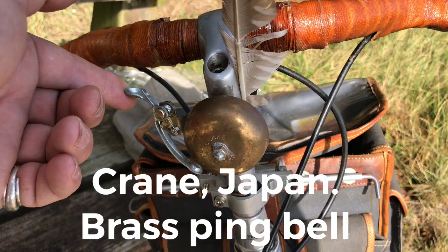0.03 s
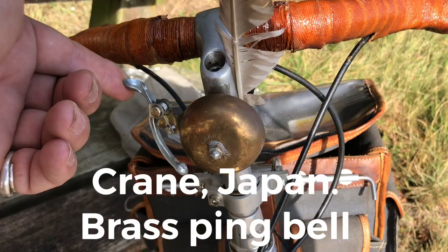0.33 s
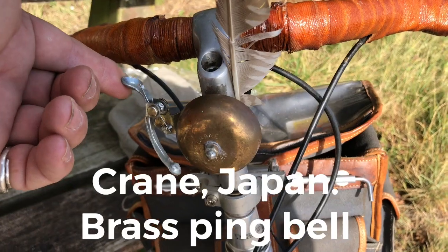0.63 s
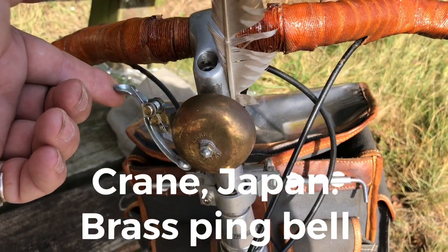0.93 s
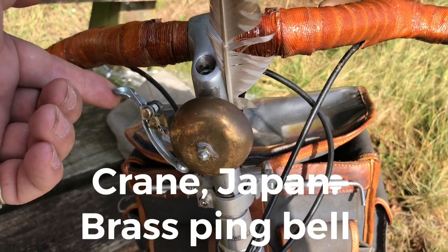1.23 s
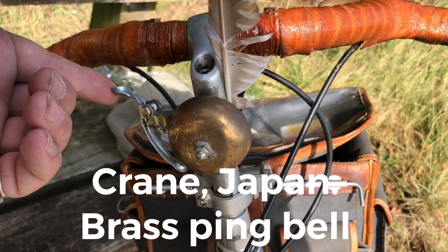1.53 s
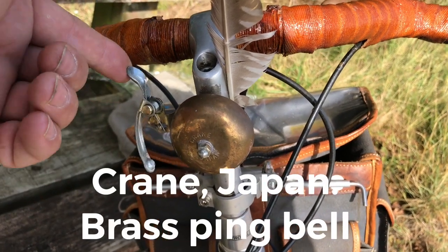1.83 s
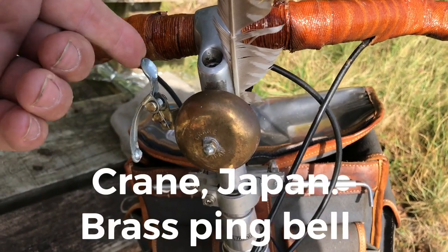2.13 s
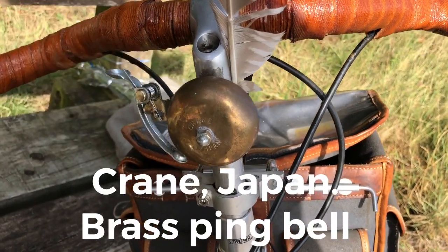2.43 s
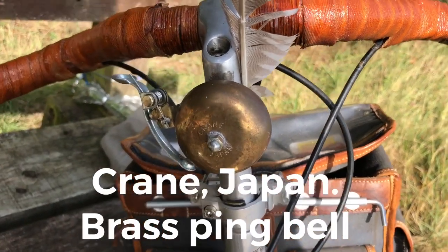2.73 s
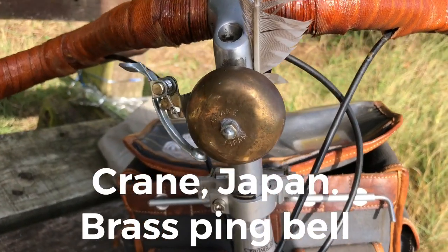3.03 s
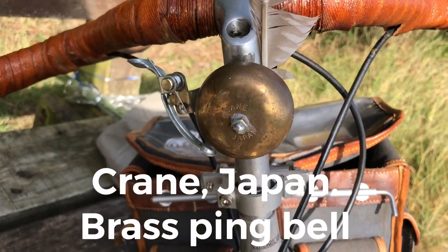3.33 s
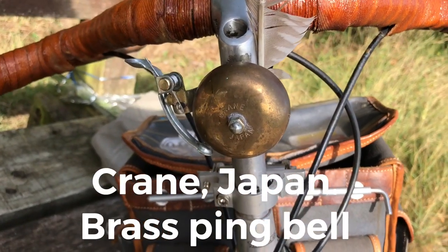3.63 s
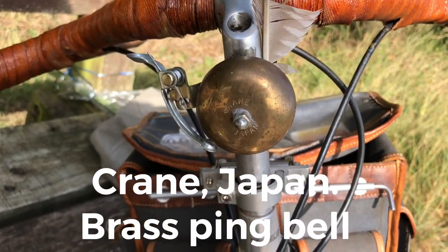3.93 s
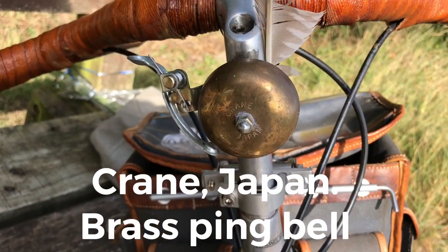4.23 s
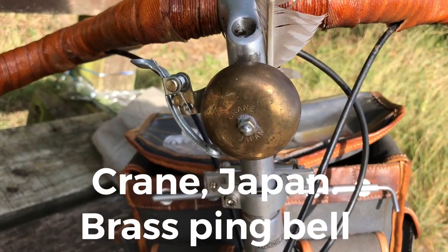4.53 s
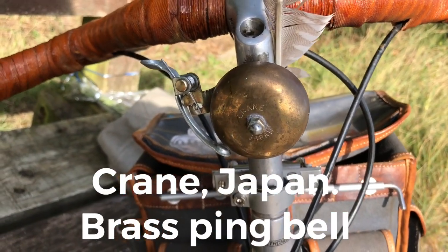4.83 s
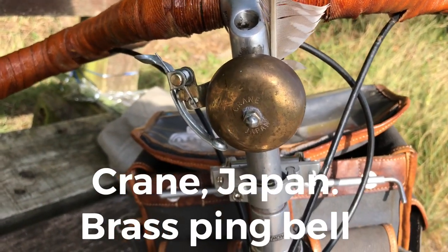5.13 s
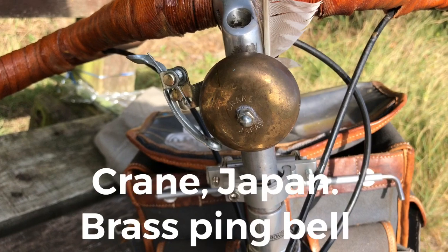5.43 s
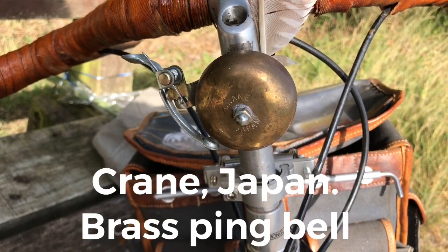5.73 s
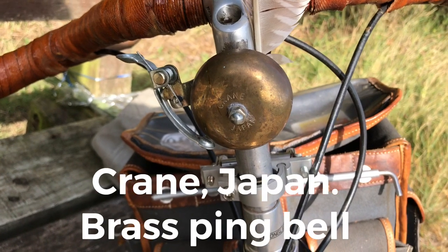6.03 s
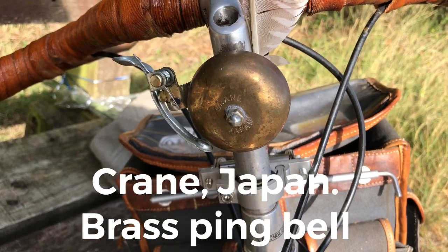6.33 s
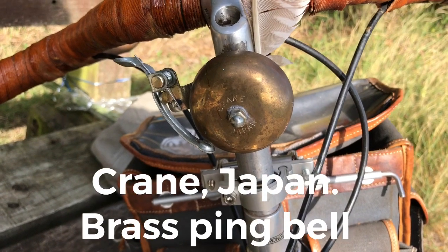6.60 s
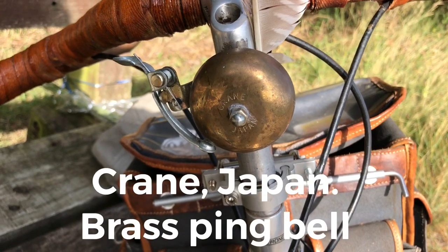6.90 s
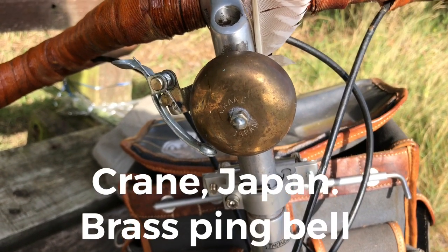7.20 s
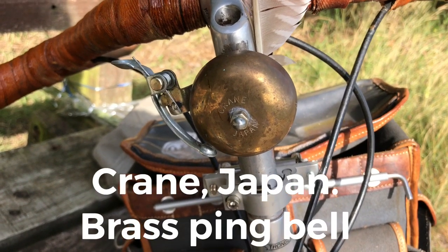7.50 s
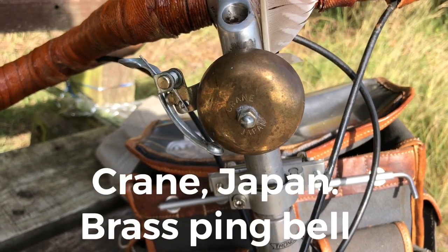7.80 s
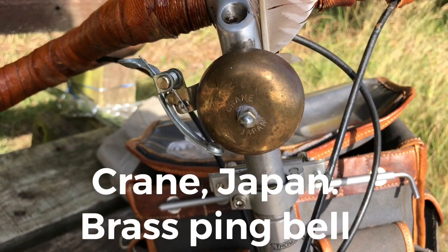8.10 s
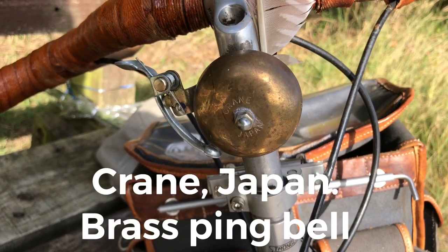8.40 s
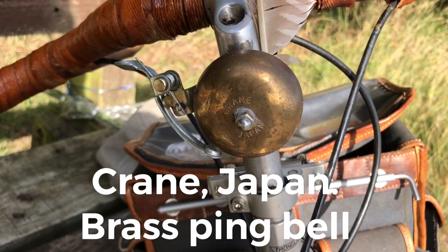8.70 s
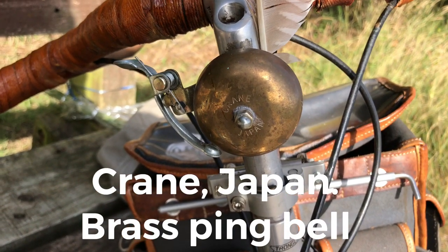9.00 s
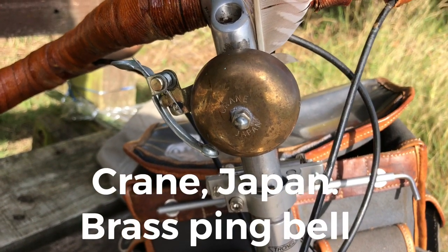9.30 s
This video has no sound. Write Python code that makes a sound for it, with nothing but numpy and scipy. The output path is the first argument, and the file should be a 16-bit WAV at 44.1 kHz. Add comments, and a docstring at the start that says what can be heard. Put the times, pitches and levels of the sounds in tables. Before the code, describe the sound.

Faint lever ticks, then one bright bicycle bell strike with a long, shimmering decay over soft wind rumble.

```python
"""A brass bicycle bell, close by, outdoors: a finger draws back the sprung lever, which ticks, and lets go.
The hammer strikes once and shakes the mount; the dome rings for seconds, its paired modes beating.
Wind buffets the microphone; birds call far off over a low rumble and faint hiss.
The camera's gain control ducks under the blow and creeps back."""
import sys
import numpy as np
from scipy import signal
from scipy.fft import rfft, irfft, next_fast_len
from scipy.io import wavfile
from scipy.ndimage import uniform_filter1d, minimum_filter1d, map_coordinates

SR = 44100
rng = np.random.default_rng(int(sys.argv[2]) if len(sys.argv) > 2 else 0)


def store_wav(level_fs):
    """Save 16-bit WAV to argv[1]."""
    pcm = np.round(np.clip(np.atleast_2d(level_fs), -1, 1) * 32767)
    wavfile.write(sys.argv[1], SR, pcm.T.astype(np.int16))


N = 421155

BREEZE_DB = -55  # wind between gusts
# hammer contacts: (time [s], peak [dB], t60 [s], knock gain [dB])
BLOWS = [(2.2922, 0, .03, -11), (2.296, -3, .028, 1), (2.3024, -10, .03, -4)]


def bell(strike_s=2.292):
    """The struck dome rings freely; its three lowest modes swell and sink in level."""
    # dome modes, upper ones split by slight unevenness:
    # (frequency [Hz], level [dB], t60 [s], split [Hz], twin gain [dB], beat lag [s])
    dome = [ (1354.25, -31, 17.1, 0, -60, 0), (3501.2, -15.5, 8.9, 0, -60, 0),
            (6135.5, -5.2, 4.24, 2.46, -2, .2), (9218, -2.7, 1.55, 20.04, -4, -.015),
            (11400, -34, .25, 0, -60, 0), (12770, -6, .9, -15.3, -4, .05), (14113, -34, .6, 13, -6, 0),
            (15374, -17, .85, -17.3, -5, .04), ]
    # faint partials, most at sums and differences of the modes as the thin shell bends far; same columns
    faint = [ (1421.9, -52, 19.5, 0, -60, 0), (2146.9, -67, 7.5, 0, -60, 0),
             (2708.5, -37.5, 8.7, 0, -60, 0), (4855.3, -42, 6.3, 0, -60, 0), (7002, -35.5, 5.3, 0, -60, 0),
             (7491, -42, 3, 2.38, -1.5, 0), (9638.8, -22, 3, 0, -60, 0), (12271, -27.5, 2.4, 4.93, -2, .01),
             ]
    # mode swells: (time [s], mode 1 gain [dB], mode 2 gain [dB], mode 3 gain [dB])
    swells = [(2.3, -3.5, -2, -10.5), (2.35, -3, 2.5, -2), (2.43, 7, 3.5, -2.5), (2.6, 8.5, 3.5, 3.5),
              (2.85, -4, -5.5, -3), (3.3, -1, -1, 1), (4.3, -1.5, 0, 1), (4.93, -1.5, 4.5, -.5),
              (6.3, 0, -1.5, 0)]
    t = np.maximum(clock() - strike_s, 0)
    swells_db = curves(swells)
    low_modes = sum(amp(db) * mode_pair(t, *mode) for mode, db in zip(dome, swells_db))
    return low_modes + sum(mode_pair(t, *mode) for mode in dome[len(swells_db):] + faint)


def mode_pair(t, hz, db, t60_s, split_hz, twin_db, lag_s, rise_s=0.01, settle_s=0.5):
    """A mode and its twin beat; the rate settles as the wide first swing dies down."""
    beat_cycles = split_hz * (t - lag_s * (1 - np.exp(-t / settle_s)))
    pair = np.sin(2 * np.pi * hz * t) + amp(twin_db) * np.sin(2 * np.pi * (hz * t + beat_cycles))
    return amp(db) * pair * fade(t, t60_s) * (1 - np.exp(-t / rise_s))


def hammer():
    """The hammer lands and chatters on its stop."""
    # impact spectrum: (frequency [Hz], level [dB])
    crack = [(100, -9), (400, 10.5), (1000, 4), (2000, -9.5), (3200, -3.5), (6000, -7), (12000, -9),
             (16000, -13.5)]
    return clicks(BLOWS, crack, crest_db=5)


def knock(rise_s=0.00033):
    """Each blow shakes the bracket and handlebar."""
    # mount modes: (frequency [Hz], level [dB], t60 [s])
    mount = [(47, -14, 0.25), (90, -11.5, 0.22), (180, -13, 0.053), (453, -19, 0.035), (797, -40, .1),
             (1035, -11.5, 0.036), (1760, -26, 0.043), (3177, -25, 0.082), (3805, -20, 0.069)]
    out, t = np.zeros(N), np.arange(SR // 2) / SR
    ring = sum((-1) ** k * amp(db) * np.sin(2 * np.pi * hz * t) * fade(t, t60_s)
               for k, (hz, db, t60_s) in enumerate(mount))
    for time_s, _, _, knock_db in BLOWS:
        add(out, time_s, amp(knock_db) * ring * (1 - np.exp(-t / rise_s)))
    return out


def lever():
    """Pivot, spring and fittings tick."""
    # contacts: (time [s], peak [dB], t60 [s])
    ticks = [(.5357, -37.5, .022), (.9098, -37, .03), (2.2687, -19, .04), (2.2824, -23, .025),
             (2.306, -21, .11), (6.069, -57, .02), (7.809, -54, .02), (8.289, -57, .02), (8.429, -57, .02)]
    # tick spectrum: (frequency [Hz], level [dB])
    steel = [(300, -27.5), (1000, -3.5), (1600, 4), (2300, -4), (3200, 1.5), (6500, -4.5), (10000, -3),
             (13000, 0), (16000, -1.5)]
    return clicks(ticks, steel, crest_db=12)


def clicks(contacts, spectrum, crest_db):
    """Each contact of steel parts is a fast-decaying noise burst."""
    out, t = np.zeros(N), np.arange(SR // 4) / SR
    for time_s, peak_db, t60_s, *_ in contacts:
        add(out, time_s, amp(peak_db - crest_db) * noise(spectrum, len(t)) * fade(t, t60_s))
    return out


def gust_flow():
    """Flow strength at the microphone: one smooth swell per gust."""
    # gusts: (centre [s], length [s], level [dB])
    gusts = [(.21, 0.163, -41), (2.267, .05, -36), (3.027, 0.13, -42), (3.23, 0.14, -41.5),
             (4.2, 0.3, -44.5), (4.64, 0.098, -44.5), (4.82, .13, -46), (5.25, 0.095, -41.5),
             (5.37, .11, -43.5), (5.596, .18, -43.5), (5.908, .14, -36.5), (6.501, .35, -50.5),
             (6.997, 0.15, -44.5), (7.259, 0.16, -42.5), (7.44, 0.22, -47), (7.795, 0.181, -43),
             (8.189, 0.133, -41)]
    t = clock()
    return sum(amp(db) * np.exp(-(2 * (t - centre_s) / length_s) ** 2)
               for centre_s, length_s, db in gusts)


def wind(flow, drift_db=1.5, lumpy_db=1.5):
    """Lumpy low turbulence on the microphone: drifting breeze plus gusts."""
    # turbulence spectrum: (frequency [Hz], level [dB])
    rumble = [(15, -30), (30, -15), (48, 3.5), (85, -0.5), (140, -8.5), (250, -20.5), (450, -31.5),
              (900, -53), (2000, -89.5)]
    breeze = amp(BREEZE_DB + drift_db * wobble(3.5))
    return np.hypot(breeze, flow) * unit(noise(rumble, N) * amp(lumpy_db * wobble(12)))


def eddies(flow, rate_hz=24, over_flow_db=6.5, scatter_db=3, half_swing_s=0.0031):
    """A few eddies thump; the rest are shed at random, scaled by the gust that carries them."""
    # square hits on the microphone port: (time [s], level [dB], half swing [s])
    thumps = [(2.24, -24.5, 0.0023), (2.991, -29.5, .001), (3.026, -20.5, 0.0019), (3.075, -21, 0.0016),
              (3.166, -25, .0015), (4.625, -29.5, 0.0023), (5.229, -17, 0.002), (5.87, -19.5, 0.0022),
              (5.932, -21.5, 0.0012), (7.004, -26, 0.0019), (7.266, -20.5, .001), (7.283, -24, 0.001),
              (7.367, -26, .0019)]
    hits = [(time_s, amp(db), width_s) for time_s, db, width_s in thumps]
    for k, (jitter, size, stretch) in enumerate(rng.standard_normal(size=(600, 3))):
        time_s = (k + jitter / 2) / rate_hz
        strength = flow[int(time_s * SR)] if 0 < time_s * SR < N else 0
        if strength > amp(BREEZE_DB):
            gain = strength * amp(over_flow_db + scatter_db * size)
            hits.append((time_s, gain, half_swing_s * np.exp(0.16 * stretch)))
    out = np.zeros(N)
    for time_s, gain, width_s in hits:
        pulse = eddy(width_s)
        add(out, time_s - len(pulse) / 2 / SR, gain * pulse)
    return out


def eddy(half_swing_s, wake_db=-12):
    """One pressure swing amid a short patch of turbulence."""
    # wake spectrum: (frequency [Hz], level [dB])
    churn = [(30, -10.5), (100, 4), (200, -2), (400, -12.5), (700, -36), (1500, -67)]
    t = np.arange(-SR // 20, SR // 20) / SR
    u = t / half_swing_s
    swing = -2 * u / (1 + u ** 2 / 2) ** 3
    patch = np.exp(-((t - .004) / .016) ** 2)
    return swing + amp(wake_db) * patch * noise(churn, len(t))


def birds():
    """Far calls swell and fade along a pitch arch; a hoarse throat scatters the pitch."""
    # calls: (start [s], length [s], pitch [Hz], arch [Hz], level [dB], hoarseness [Hz])
    calls = [(.29, .09, 1950, 60, -74, 25), (1.13, .54, 1450, 140, -71, 32),
             (1.79, .32, 1560, 80, -68.5, 110)]
    out = np.zeros(N)
    for start_s, length_s, hz, arch_hz, db, hoarse_hz in calls:
        arch = np.sin(np.pi * np.clip((clock() - start_s) / length_s, 0, 1))
        pitch_hz = hz + arch_hz * arch + hoarse_hz * wobble(200)
        out += amp(db) * arch * np.sin(2 * np.pi * np.cumsum(pitch_hz) / SR)
    return out


def outdoors(rumble_gain_db=4, hiss_db=-69):
    """Hollow distant rumble and faint, even hiss."""
    # rumble envelope: (time [s], base level [dB])
    swell = [(0, -59.5), (1.1, -55.5), (1.75, -48.5), (3.5, -59.5), (4.3, -53.5), (5.1, -49.5), (5.7, -52),
             (8.5, -54), (9.1, -50), (9.55, -58.5)]
    # rumble spectrum: (frequency [Hz], level [dB])
    far = [(60, -11), (130, -11), (170, 3), (210, 6.5), (260, -5.5), (330, -17), (500, -25), (900, -50),
           (2000, -89)]
    # hiss spectrum: (frequency [Hz], level [dB])
    hiss = [(100, -4.5), (500, -4), (1000, -1.5), (1500, -7.5), (2500, -11), (5000, -17.5), (9000, -19),
            (15500, -17.5)]
    base_db, = curves(swell)
    rumble = amp(base_db + rumble_gain_db + 0.33 * wobble(3.6)) * noise(far, N)
    return rumble + amp(hiss_db) * noise(hiss, N)


def gain_control(x, threshold_db=-17, duck_s=0.13, release_db_per_s=19.5):
    """Loud sound turns the gain down; it creeps back at a steady rate."""
    level_db = 10 * np.log10(np.abs(uniform_filter1d(x ** 2, size=441)) + 1e-12)
    excess_db = np.maximum(level_db - threshold_db, 0)
    recovery_db = release_db_per_s * clock()
    cut_db = np.maximum.accumulate(excess_db + recovery_db) - recovery_db
    window = np.clip(duck_s * SR - np.arange(SR // 2), 0, 1)
    return x * amp(-signal.fftconvolve(cut_db, window / window.sum())[:N])


def limiter(x, ceiling=0.78):
    """Holds the fast peaks that pass the gain control."""
    gain = ceiling / np.maximum(np.abs(x), ceiling)
    return x * uniform_filter1d(minimum_filter1d(gain, size=353), size=177)


def amp(db):
    """Decibels to gain."""
    return 10 ** (np.asarray(db) / 20)


def unit(x):
    """Scale to rms 1."""
    return x / np.sqrt(np.mean(x ** 2) + 1e-20)


def clock():
    """Sample times [s]."""
    return np.arange(N) / SR


def curves(rows):
    """Per-sample curve for each column after the time."""
    time_s, *columns = np.transpose(rows)
    return [np.interp(clock(), time_s, column) for column in columns]


def wobble(knots_per_s):
    """Smooth random curve."""
    return map_coordinates(rng.standard_normal(4096), [clock() * knots_per_s], mode="wrap")


def noise(spectrum, size):
    """Noise of rms 1, shaped by (frequency [Hz], level [dB]) points."""
    hz, db = np.transpose(spectrum)
    n_fft = next_fast_len(size)
    bins_hz = np.fft.rfftfreq(n_fft, 1 / SR)
    gain = amp(np.interp(np.log(bins_hz + 1), np.log(hz), db))
    return unit(irfft(rfft(rng.standard_normal(n_fft)) * gain, n_fft)[:size])


def add(track, start_s, sound):
    """Mix a sound into the track."""
    part = track[max(round(start_s * SR), 0):][:len(sound)]
    part += sound[:len(part)]


def fade(t, t60_s):
    """Free decay, 60 dB in t60_s."""
    return np.exp(-np.log(1000) * t / t60_s)


def scene():
    """Bell, background and wind at one microphone."""
    bicycle = bell() + lever() + hammer() + knock()
    flow = gust_flow()
    return (bicycle + outdoors() + birds() + wind(flow) + eddies(flow))[None]


def record(dry, top_hz=15900):
    """Camera input: brief silence and fade-in, gain control, limiter, band limit."""
    fade_in = np.clip((clock() - .07) / .02, 0, 1)
    x = limiter(gain_control(dry[0] * fade_in))
    n_fft = next_fast_len(N + SR // 2)
    passband = np.clip((top_hz - np.fft.rfftfreq(n_fft, 1 / SR)) / 200 + .5, 0, 1)
    return irfft(rfft(x, n_fft) * passband, n_fft)[None, :N]


dry = scene()
out = record(dry)
store_wav(out)
```